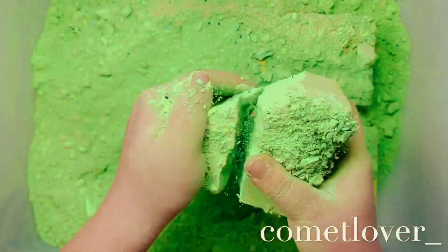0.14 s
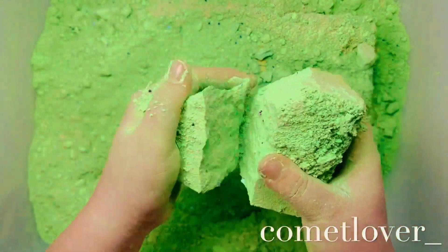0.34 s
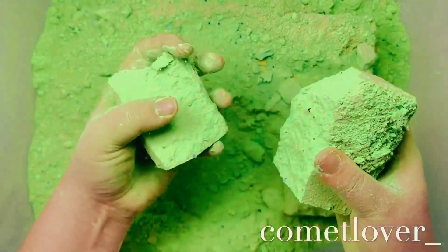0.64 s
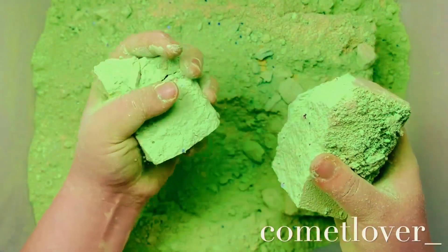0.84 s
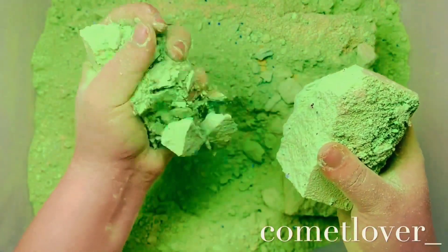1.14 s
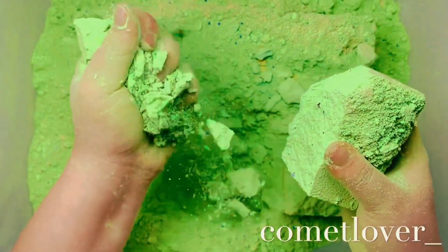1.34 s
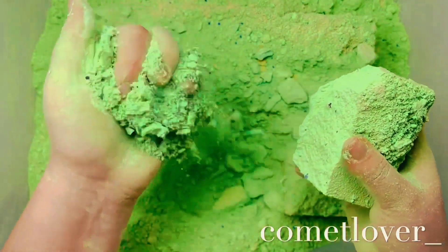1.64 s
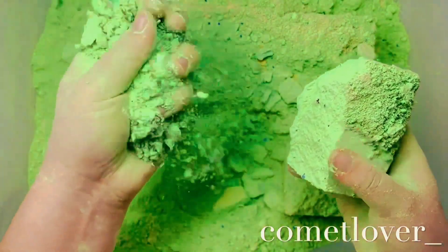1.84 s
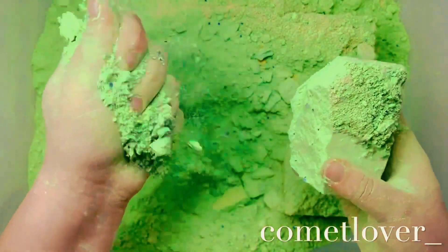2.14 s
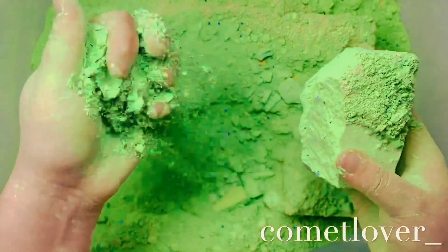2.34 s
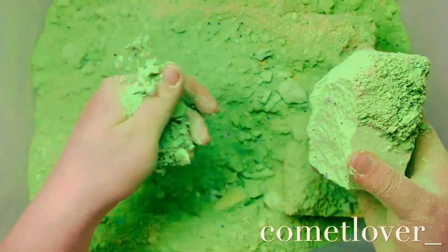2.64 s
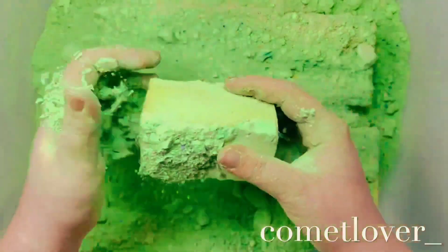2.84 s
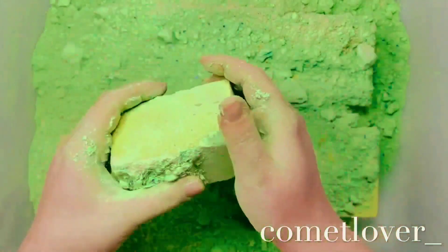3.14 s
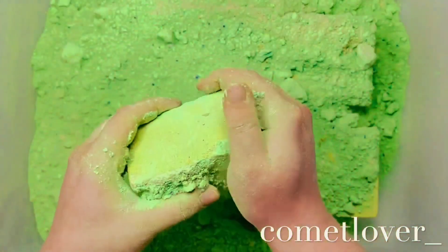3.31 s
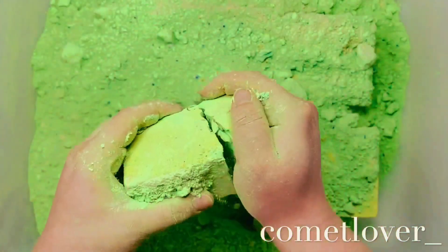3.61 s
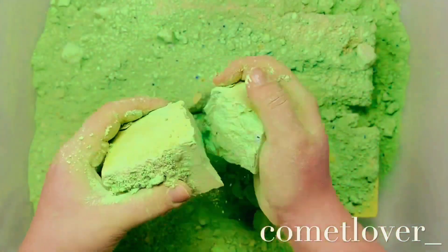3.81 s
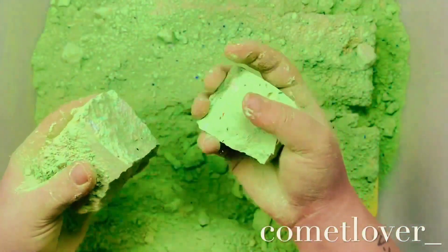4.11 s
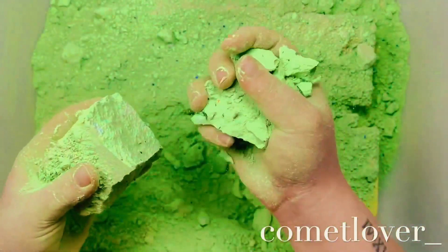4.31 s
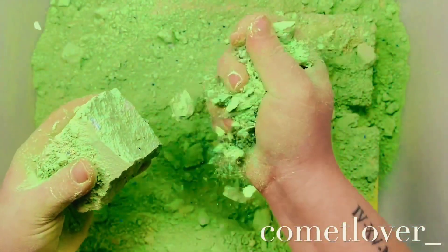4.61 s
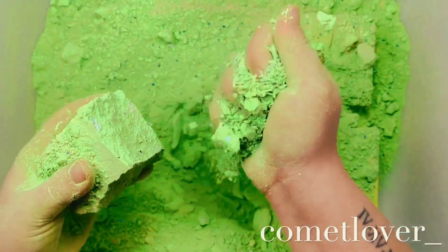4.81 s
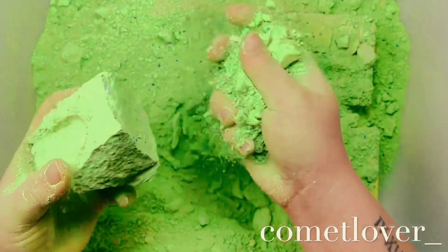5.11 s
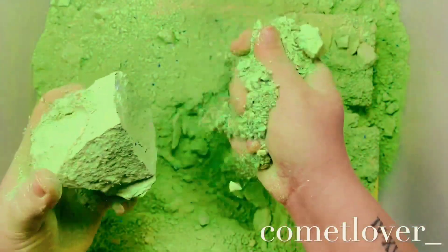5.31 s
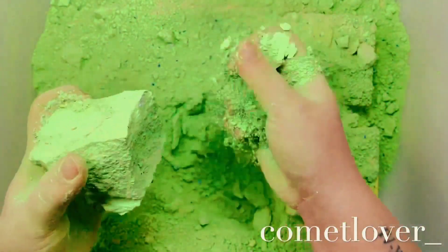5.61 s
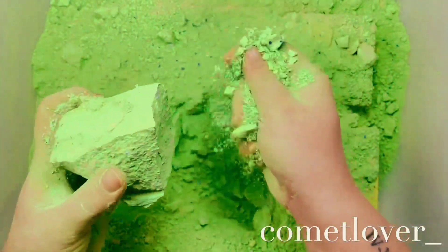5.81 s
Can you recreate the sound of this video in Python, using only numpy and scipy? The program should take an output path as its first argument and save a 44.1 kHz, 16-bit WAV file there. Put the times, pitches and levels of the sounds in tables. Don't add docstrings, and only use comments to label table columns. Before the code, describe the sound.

Very close, dry mono sound of soft chalk broken by hand over a plastic tub, with low appliance hum and faint hiss throughout. At 0.1 s a block splits with a crisp crack and a soft low push of air. Two needle-sharp ticks come at 0.25 and 0.32 s, then a tiny fluttering finger squeak and light powdery rubs. From 0.8 s the lump cracks; between 1.1 and 1.65 s it collapses in dense, loud crunches and short gritty grinds with deep tub thumps. Crackle, powder hiss and pattering crumbs thin out until about 2.6 s, with a very brief dropout near 2.7 s. Small lumps drop and fingers rub around 2.7-3.2 s. A second snap and thump lands at 3.56 s. Crushing returns at 4.15, peaks at 4.45 s, and continues as uneven crunches to 5.1 s, ending with snicks, soft thumps, sparse grit and a last hissy rub. Gain dips after the loudest breaks.

```python
import sys
import numpy as np
from scipy import signal
from scipy.io import wavfile
from scipy.ndimage import uniform_filter1d

SR = 44100
rng = np.random.default_rng(int(sys.argv[2]) if len(sys.argv) > 2 else 0)


def elevation(decibels):
    levels = np.asarray(decibels, float)
    return 10 ** (levels / 20)


def transcribe(u):
    v = np.clip(np.atleast_2d(u).T, -1, 1)
    q = np.round(v * 32767).astype(np.int16)
    wavfile.write(sys.argv[1], SR, q)


N = 262395

# t/s, level/dB, ring f/Hz, fine crackle re the ring/dB, length/s
BREAKS = [(.0934, -8, 2450, -6.5, 0.0024), (.7875, -23.5, 676, 1, 0.0066),
          (.9205, -11.5, 1850, -15, 0.00052), (1.1218, -9, 2780, -12, .0022),
          (1.1287, -3, 1890, -6, 0.0068), (1.134, -8, 760, -21, 0.004), (1.175, -15, 1650, -14, 0.0032),
          (1.2407, -15, 1100, -12, 0.002), (1.2472, -10.5, 1680, -11, 0.0021),
          (1.2936, -7.5, 3150, -8, 0.002915), (1.2975, -1.5, 425, -24, 0.0033),
          (1.3685, -13, 1100, -16, 0.00415), (1.375, -9.5, 690, -17, 0.0015),
          (1.5605, -13, 1050, -15, 0.00393), (1.6113, -4, 910, -15, 0.0015),
          (1.923, -11, 2600, -17, 0.00091), (3.561, -16, 1680, 1.5, 0.0038),
          (4.1531, -11, 2300, 4.5, 0.005), (4.154, -10, 594, -20, 0.0012),
          (4.2155, -10.5, 2540, -5.5, 0.004), (4.4448, -0.5, 1580, -17, 0.0012),
          (4.445, -7, 790, -5, 0.0019), (4.6188, -9, 1870, -13, 0.0019), (4.733, -11, 770, -20, 0.0025),
          (5.473, -14, 2500, -27, 0.0038)]
# t/s, level/dB, ring f/Hz
KNOCKS = [(.752, -25, 724), (2.75, -20, 760), (2.961, -25, 690), (1.622, -13, 900), (4.737, -13.5, 1860),
          (4.703, -20.5, 606), (.806, -25, 870), (.894, -25, 2280), (.9645, -19.5, 2520),
          (.995, -19.5, 2280), (1.2552, -15, 730), (1.341, -16, 1030), (1.3797, -11.5, 2080),
          (1.415, -21, 1070), (1.462, -9.5, 1030), (1.6905, -14, 1010), (1.564, -13.5, 603),
          (4.6245, -18, 800), (4.869, -27, 1000), (2.8525, -24.5, 1700), (2.481, -28, 1050),
          (1.7417, -24, 1030), (1.9733, -11.5, 910), (2.1447, -26.5, 1640), (2.615, -29, 1510),
          (3.7946, -26, 2670), (4.528, -20.5, 1070), (4.567, -16.5, 540), (4.9129, -16.5, 1020),
          (4.9557, -14, 690), (4.9716, -14, 980), (5.0018, -21, 2060), (5.2386, -17.5, 647),
          (5.352, -17, 1080), (5.5845, -16, 784), (5.7141, -22, 1280)]
# t/s, level/dB, ring f/Hz
CRUNCHES = [(.9085, -20.5, 670), (.964, -23, 940), (1.149, -31, 1650), (1.162, -28, 2150),
            (1.261, -25, 1000), (1.331, -25, 544), (1.514, -19.5, 1060), (1.6186, -13.5, 990),
            (1.632, -15.5, 1960), (1.7578, -22, 4700), (2.278, -32, 1740), (2.307, -25, 1020),
            (2.439, -25, 880), (4.696, -22, 2480), (2.5618, -36, 1250), (2.7497, -16, 790),
            (2.8504, -24, 1050), (2.867, -27, 2500), (4.027, -35, 1010), (4.247, -27, 2680),
            (4.3786, -19.5, 890), (4.4605, -18, 1800), (4.459, -23, 900), (2.701, -26, 2140),
            (4.576, -32, 2190), (4.6073, -20, 1440), (4.632, -17, 776), (4.668, -23, 790),
            (4.761, -19, 920), (4.824, -21, 736), (4.9461, -25, 2550), (5.0836, -30, 1670)]
# t/s, level/dB, ring f/Hz
FLAKES = [(.0032, -32, 2680), (.119, -26.5, 3000), (.348, -38, 3500), (.37, -42, 3670), (.4319, -33, 4560),
          (.523, -36, 4710), (.6, -34, 4860), (.6363, -23, 2600), (.64, -24.5, 5070), (.7525, -29, 4100),
          (.776, -30, 4450), (.9861, -27, 4770), (2.269, -31, 4850), (2.309, -25, 6000), (2.763, -29, 4920),
          (2.9299, -34, 4040), (3.217, -26, 3020), (3.48, -48, 3870), (3.7603, -27.5, 4400),
          (3.808, -33, 3220), (3.89, -31, 4020), (4.074, -34, 4040), (4.7722, -19, 2550), (4.5, -35, 1700),
          (5.666, -48, 4790), (5.873, -24, 3440)]
# t/s, level/dB, ring f/Hz
SNICKS = [(.8419, -30.5, 3100), (1.7954, -16.5, 2800), (1.911, -20, 1600), (2.4477, -19, 2900),
          (3.245, -17, 2860), (3.337, -29, 2520), (3.452, -22.5, 1960), (5.7, -23, 3000), (4.3, -18, 1540),
          (4.634, -15, 2800), (2.5, -27, 3000), (2.556, -31, 1700), (2.232, -30, 2300), (1.8, -29, 2000),
          (4.234, -27, 2720), (3.3, -29, 4500), (5.302, -22, 3000), (5.32, -20, 2160),
          (5.4765, -12.5, 1780), (5.479, -15, 2100), (4.3, -19, 10000), (5.413, -26, 3900)]
# t/s, level/dB, ring f/Hz
GRIT = [(1.7214, -37, 1080), (1.772, -26, 1310), (1.8416, -24, 2200), (1.888, -32, 1060), (1.9, -24, 2000),
        (1.945, -32, 2400), (2.021, -32, 2200), (2.0596, -29, 4500), (2.108, -31, 2000),
        (2.1359, -26, 1050), (2.2317, -33, 1570), (2.2502, -31, 1070), (2.4253, -31, 890),
        (2.5076, -37, 990), (2.536, -26, 1110), (2.9162, -30, 790), (3.0154, -23.5, 2740),
        (3.0977, -33, 1110), (4.8755, -28, 1770), (5.0885, -33, 1670), (5.1249, -28, 2500),
        (5.2157, -28, 1080), (5.272, -32, 2500), (5.437, -42, 3500), (5.5285, -28, 1700),
        (5.548, -32, 3300), (5.6123, -47, 1070), (5.6502, -47, 1110), (5.6911, -44, 1090),
        (.733, -30, 3200), (.444, -35, 1010), (4.083, -39, 3000)]


def all_cracks():
    kinds = [(KNOCKS, (-18, .0023)), (CRUNCHES, (-6, .0048)), (FLAKES, (-3, .0036)),
             (SNICKS, (-10, .0011)), (GRIT, (-3, .0014))]
    small = [row + kind for rows, kind in kinds for row in rows]
    return BREAKS + small


# f/Hz, level per Hz/dB
POWDER = [(1200, -14), (2500, -1), (4500, 0), (8000, -6), (11500, -12), (15500, -12)]
# f/Hz, width/Hz, level/dB
LINGER = [(1078, 40, -5.5), (1715, 43, -2)]
SNAP_DB = 16
RING_WIDTH = .11
DULL_HZ = 149


def cracks():
    out, t = np.zeros(N), np.arange(2200) / SR
    powder_taps = taps_of(POWDER)[:256]
    for s, db, hz, fine_db, length in all_cracks():
        ring_noise, fine_noise, unevenness = rng.standard_normal((3, len(t)))
        u = t / max(length, .0007)
        burst_fall = np.exp(-(u / 1.4) ** 1.4)
        debris = .09 * np.exp(-t / .012)
        shape = (1 - np.exp(-1.8 * u)) * (burst_fall + debris)
        shape = shape * elevation(3.0 * unevenness)
        snap = -elevation(SNAP_DB) * (np.arange(len(t)) == round(.0004 * SR + length * SR / 2))
        micro_cracks = ring_noise * shape + snap
        face = band(micro_cracks, 0.19 * hz, 1.5 * hz)
        width = RING_WIDTH * hz * (hz / 1000) ** 0.2 + DULL_HZ * (500 / hz) ** 2
        ring = resonate(resonate(micro_cracks, hz, width), hz, 1.9 * hz)
        lump = topped(ring) + 0.75 * topped(face)
        fine = np.convolve(fine_noise * shape + snap, powder_taps)[:len(t)]
        add(out, s - .0004, elevation(db - 1.43) * (topped(lump) + elevation(fine_db) * topped(fine)))
    return out + sum(elevation(db) * resonate(out, hz, width) for hz, width, db in LINGER)


# t/s, length/s, level/dB
GRINDS = [(1.126, 0.065, -23), (1.238, 0.019, -25.5), (1.364, 0.032, -25.5), (4.447, 0.03, -25),
          (4.476, 0.075, -38.5), (4.166, 0.092, -35.5), (1.295, 0.076, -36), (1.632, .02, -32),
          (4.635, .04, -33), (5.216, 0.1, -35.5), (0.785, 0.021, -22.5), (0.891, 0.041, -26.5),
          (1.592, 0.032, -27.5), (1.962, 0.069, -34.5), (2.06, 0.091, -38), (2.252, 0.073, -32),
          (4.726, 0.058, -32), (4.945, 0.042, -33), (5.077, 0.061, -33), (5.505, 0.092, -33.5)]


def grinding():
    grit = grains(2500, 3.6, 2.2, 70, .0004)
    grit = colour(grit, [(300, 1), (700, -0.5), (2000, -2.0), (4500, -5.5), (9000, -13.5), (15500, -26)])
    t, loudness = np.arange(N) / SR, np.zeros(N)
    for s, length, db in GRINDS:
        sink_db = 1.7 * np.clip((t - s) / length, 0, 1)
        start, stop = (t - s) / 0.0027, (s + length - t) / 0.0078
        loudness += elevation(db - sink_db) * np.clip(np.minimum(start, stop), 0, 1)
    return evened(grit) * loudness


# t/s, grip level/dB, spill into the tub level/dB
CRUMBLE = [(0.0, -42.5, -28), (0.35, -57.5, -42), (0.94, -40.5, -34.5), (1.19, -42.5, -32.5),
           (1.37, -32, -14.5), (1.47, -40.5, -28.5), (1.74, -35, -25.5), (2.38, -39.5, -29),
           (2.55, -40, -32.5), (2.92, -37.5, -24.5), (3.18, -50, -38), (3.6, -49, -33.5), (3.8, -47, -33),
           (4.19, -42.5, -32), (4.47, -46.5, -36), (4.78, -37, -32), (5.4, -38, -28.5), (5.95, -39, -34.5)]
# f/Hz, level per Hz/dB
CRUMBS = [(240, -20.5), (400, 5), (480, -10), (684, 1.5), (1070, -1), (1310, -5), (1690, 0), (1870, -2.5),
          (2630, -10.5), (9100, -10.5), (11800, -47), (20000, -120)]
# f/Hz, width/Hz, level/dB
HOLLOW = [(790, 370, 3), (1093, 43, 9.5), (1680, 110, 5), (2600, 670, 11)]
# f/Hz, width/Hz, level/dB
TUB = [(93.5, 22, -1), (146, 21, -3.5), (251.5, 54.5, -5), (356.2, 14, -14.5)]
DUST_DB, DUST_PER_GRIP = -42, 1.32


def crumbling():
    crumbs = colour(grains(1600, 3.5, 2.8, 22, .0008), CRUMBS)
    crumbs += sum(elevation(db) * resonate(crumbs, hz, width) for hz, width, db in HOLLOW)
    dust = colour(grains(2000, 3.3, 3.0, 12, .0005), POWDER)
    bits = grains(600, 1.7, 0.8, 25, .002)
    patter = np.zeros(N)
    for hz, width, db in TUB:
        ring = resonate(resonate(bits, hz, width), hz, 3 * width)
        patter += elevation(db) * evened(ring)
    grip_db, spill_db = curve(CRUMBLE, column=1), curve(CRUMBLE, column=2)
    dust_db = DUST_DB + DUST_PER_GRIP * (grip_db + 40)
    return elevation(grip_db) * evened(crumbs) + elevation(dust_db) * evened(dust) + elevation(spill_db) * evened(patter)


# t/s, peak level/dB, f/Hz, t60/s, wall slap/dB
JOLTS = [(.782, -6, 56, 0.017, -31), (1.1205, -11, 120, 0.039, -18), (1.1295, -3, 75, 0.04, -8),
         (1.243, -22, 85, 0.03, -5), (1.2985, -3, 111, 0.025, 0), (1.3072, 2, 88.5, 0.07, -22),
         (1.347, -14, 80, 0.04, -30), (1.38, -13, 57.3, 0.13, -21), (1.5615, -14, 110, 0.024, -3.5),
         (1.5705, 1.5, 78, 0.071, -15), (1.6005, -6, 90, 0.04, -30), (1.612, -9, 90, 0.06, -11),
         (4.1535, -4, 60, 0.022, -8.5), (4.445, -5, 100, 0.031, -21), (4.772, -15, 92, 0.11, -45),
         (5.462, -14, 49.5, 0.13, -45), (5.496, -11.5, 45, .06, -47)]
# t/s, peak level/dB, f/Hz, wall slap/dB
LUMPS = [(0.89, -10, 61, -14.5), (1.85, -14, 92.5, -34), (1.967, -17, 97, -50), (2.149, -28, 79, -14),
         (2.312, -14, 80, -20), (2.327, -13, 80, -21), (2.348, -15, 90, -27), (2.58, -13, 60, -30),
         (1.99, -16, 95, -30), (2.75, -35, 64, -13), (2.798, -25, 71, -40), (2.717, -25, 90, -19),
         (2.844, -17, 116, -20), (2.856, -17, 126, -13), (2.877, -17, 110, -24), (2.915, -19, 90, -12),
         (2.934, -36, 90, -23), (2.962, -27, 92, -14), (2.978, -15, 99, -20), (2.996, -23, 99, -20),
         (3.018, -18, 164, -38), (4.2142, -7.5, 80, -34), (4.376, -16, 80.7, -18), (4.973, -8, 56, -19.5),
         (5.582, -12, 56.5, -26)]
# t/s, peak level/dB, f/Hz, t60/s, wall slap/dB
SPLITS = [
    (0.0933, -1.5, 105, 0.045, -11),
    (3.5606, -3.5, 125, 0.029, -7.5),
    (4.567, -11, 137, 0.028, -17.5),
    (1.1355, -3, 45, .06, -13),
    (1.263, -8.5, 65, .06, -33),
    (4.159, -3, 41, 0.044, -42),
    (4.4425, -11, 140, 0.022, -30),
    (4.984, -13, 67, .04, -40),
    (3.567, -6, 46, 0.036, -27),
    (4.705, -16.5, 180, 0.024, -17),
]
LUMP_T60_S = 0.031


def all_thuds():
    inward = JOLTS + [(s, db, hz, LUMP_T60_S, slap_db) for s, db, hz, slap_db in LUMPS]
    return [(-1,) + row for row in inward] + [(1,) + row for row in SPLITS]


def thuds():
    out, t = np.zeros(N), np.arange(9000) / SR
    sagging_t = t + 0.0027 * (1 - np.exp(-t / 0.00085))
    wall = np.zeros(len(t))
    for wall_hz, wall_db in ((185., 3.5), (255., 4.0), (390., -4.5)):
        wall += elevation(wall_db) * np.sin(2 * np.pi * wall_hz * t)
    for way, s, db, hz, t60, slap_db in all_thuds():
        swing = np.sin(2 * np.pi * hz * sagging_t) * elevation(db - 60 * t / max(t60, .02))
        slap = wall * elevation(slap_db - 7.5 - 60 * t / 0.045)
        add(out, s, way * (swing + slap) * np.minimum(t / 0.0029, 1))
    return out + sum(elevation(db + 4.5) * resonate(out, hz, width) for hz, width, db in TUB)


# t/s, peak level/dB
TICKS = [
    (.2544, 1),
    (.3186, 1),
]


def ticks():
    out, t = np.zeros(N), np.arange(900) / SR
    for s, db in TICKS:
        spray = .11 * rng.standard_normal(len(t)) * np.exp(-t / .0026)
        spray[:3] = -1, .8, .1
        spray = colour(spray, [(500, -36), (2500, -10), (5000, -10), (9000, 0), (15000, 0), (16600, -14)])
        add(out, s, elevation(db) * spray / abs(spray).max())
    return out


# t/s, length/s, level/dB, centre f/Hz
RUBS = [(0.331, 0.05, -45, 3700), (0.417, 0.033, -49, 4460), (0.512, 0.028, -45, 4380),
        (0.58, 0.038, -44.5, 4320), (0.638, 0.042, -40.5, 5060), (2.682, 0.071, -42, 6900),
        (2.994, 0.092, -36, 4970), (3.174, 0.072, -41.5, 5200), (3.76, 0.036, -47, 4860),
        (3.83, 0.042, -45, 5100), (3.87, 0.052, -36, 6500), (3.957, 0.096, -54, 7500),
        (5.338, 0.13, -41.5, 7900), (5.828, 0.078, -36.5, 8400)]


def rubs():
    out = np.zeros(N)
    for s, length, db, hz in RUBS:
        noise = rng.standard_normal(6000)
        hiss = colour(noise, [(hz / 4, -30), (hz / 2, -3), (hz, 0), (hz * 2, -7), (hz * 4, -14)])
        hiss = evened(hiss)
        hiss += sum(1.46 * resonate(hiss, hz * share, 480) for share in (.56, .75, 1.1))
        u = np.arange(round(length * SR)) / (length * SR)
        stroke = np.sin(np.pi * u ** 1.2) ** 0.4
        add(out, s, elevation(db) * hiss[:len(u)] * stroke)
    return out


# t/s, level/dB, f/Hz
SQUEAK = [
    (0.335, -42, 3460),
    (0.355, -33, 3550),
    (0.367, -37, 3370),
    (0.385, -52, 3300),
]


def squeak():
    start, stop = SQUEAK[0][0], SQUEAK[-1][0]
    on = np.interp(np.arange(N) / SR, [start - .01, start, stop, stop + .01], [0, 1, 1, 0])
    whistle = resonate(rng.standard_normal(N), curve(SQUEAK, 2), 120)
    return on * elevation(curve(SQUEAK, 1)) * evened(whistle)


# t/s, level/dB
SWAY = [(0.1, -19.5), (0.36, -46), (0.79, -20), (1.14, -21), (1.47, -20), (1.62, -20), (1.9, -34),
        (2.268, -35), (4.15, -29), (4.41, -37), (4.6, -39), (5.1, -37), (5.5, -18)]
STILL_AIR_DB, GUST_RISE_DB_S, GUST_FALL_DB_S = -43, 234, 128
DRIFT_DB, DRIFT_SWELL_DB = -28, 1.5
PUSH_S, PUSH_CYCLE_S, PUSH_DB = .49, .25, -10.5


def moving_air():
    t, gusts = np.arange(N) / SR, np.zeros(N)
    for s, db in SWAY:
        gusts += elevation(db - np.maximum(GUST_RISE_DB_S * (s - t), GUST_FALL_DB_S * (t - s)))
    air = evened(band(rng.standard_normal(N), 18, 42))
    drift = evened(band(rng.standard_normal(N), 2, 14))
    drift *= elevation(DRIFT_DB + DRIFT_SWELL_DB * wander(1.7))
    u = np.clip((t - PUSH_S) / PUSH_CYCLE_S, 0, 1)
    push = elevation(PUSH_DB) * np.sin(2 * np.pi * u) * np.sqrt(np.sin(np.pi * u) + 1e-12)
    return (elevation(STILL_AIR_DB) + gusts) * air + drift + push


# f/Hz, level/dB
HUM = [(29.7, -45), (59.2, -28), (118.4, -36), (150.7, -39), (183.0, -41.5), (236.9, -50), (360.7, -55)]
# f/Hz, level per Hz/dB
ROOM = [(15, -14.5), (25, 13.5), (64, -6), (101, 0), (139, -7.5), (220, -7), (366, -15.5), (563, -18),
        (679, -19), (1560, -27.5), (4000, -26), (15300, -30.5)]
ROOM_DB = -40.5


def room():
    t, hum = np.arange(N) / SR, np.zeros(N)
    for hz, db in HUM:
        line = np.sin(2 * np.pi * (hz * t + rng.random()))
        hum += np.sqrt(2) * elevation(db + 0.76 * wander(0.94)) * line
    hiss = colour(rng.standard_normal(N) * elevation(1.8 * wander(36)), ROOM)
    hiss *= elevation(ROOM_DB) / band(hiss, 200, 15000).std()
    return hum + hiss


def grains(per_s, spread_db, clump_db, clump_hz, tail_s):
    happens = rng.random(N) < per_s / SR
    size = elevation(spread_db * np.minimum(rng.exponential(1, N), 3)) * happens
    clumps = elevation(clump_db * np.clip(wander(clump_hz), -2, 2))
    rustle = signal.lfilter([1], [1, -np.exp(-1 / (tail_s * SR))], size * clumps)
    return rustle * rng.standard_normal(N)


def resonate(x, hz, width):
    turn = np.exp(2j * np.pi * np.cumsum(hz * np.ones(len(x))) / SR)
    r = np.exp(-np.pi * width / SR)
    return 2 * (turn * signal.lfilter([1 - r], [1, -r], x / turn)).real


def taps_of(points):
    f, db = np.transpose(points)
    hz = abs(np.fft.fftfreq(8192, 1 / SR))
    gain_db = np.interp(np.log(hz + 1), np.log(f + 1), db)
    log_gain = np.log(elevation(np.maximum(gain_db, -80)))
    return np.fft.ifft(np.exp(log_gain - 1j * signal.hilbert(log_gain).imag)).real[:4096]


def colour(x, points):
    return signal.oaconvolve(x, taps_of(points))[:len(x)]


def band(x, low_hz, high_hz):
    return signal.sosfilt(signal.butter(3, [low_hz, high_hz], "band", fs=SR, output="sos"), x)


def wander(hz):
    return evened(signal.sosfilt(signal.butter(2, hz, fs=SR, output="sos"), rng.standard_normal(N)))


def evened(x):
    return x / np.sqrt(np.mean(x ** 2) + 1e-20)


def topped(burst):
    return burst / np.sqrt(2 * uniform_filter1d(burst ** 2, size=66).max())


def curve(rows, column):
    rows = np.array(rows)
    return np.interp(np.arange(N) / SR, rows[:, 0], rows[:, column])


def add(mix, s, sound):
    part = mix[round(s * SR):][:len(sound)]
    part += sound[:len(part)]


def scene():
    near = cracks() + grinding() + crumbling() + rubs() + squeak()
    t = np.arange(3000) / SR
    walls = rng.standard_normal(len(t)) * elevation(-60 * t / 0.11) * (t > .002)
    near += elevation(-18) * signal.oaconvolve(near, walls / np.linalg.norm(walls))[:N]
    mix = near + thuds() + moving_air() + room()
    low_pass = signal.firwin(601, 15450, window=("kaiser", 8), fs=SR)
    cut = signal.oaconvolve(mix, low_pass, "same")
    return (cut + elevation(-42) * (mix - cut) + ticks())[None]


def top_cut(x):
    return signal.sosfilt(signal.butter(12, 16520, fs=SR, output="sos"), x)


# t/s, gain
DROPOUT = [
    (2.6815, 1),
    (2.684, .08),
    (2.688, .12),
    (2.696, 1),
]


def record(dry):
    bright = signal.sosfilt(signal.butter(1, 60, "high", fs=SR, output="sos"), dry[0])
    power_db = 10 * np.log10(abs(uniform_filter1d(bright ** 2, size=300)) + 1e-12)
    fall_db = np.arange(N) * 35. / SR
    held_db = np.maximum.accumulate(power_db + fall_db) - fall_db
    over_db = np.maximum(held_db + 15, 0)
    late_db = signal.lfilter([.004], [1, -.996], over_db)
    flattened = np.clip(curve(DROPOUT, 1) * dry / elevation(0.28 * late_db), -1, 1)
    low_pass = signal.firwin(301, 16350, window=("kaiser", 8), fs=SR)[None]
    mix = np.clip(signal.oaconvolve(flattened, low_pass, "same"), -1, 1)
    return top_cut(mix)


dry = scene()
out = record(dry)
transcribe(out)
```